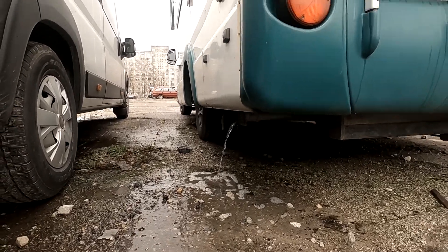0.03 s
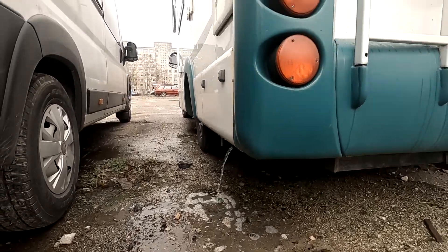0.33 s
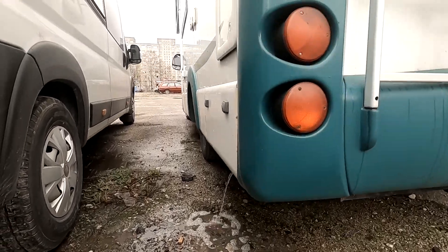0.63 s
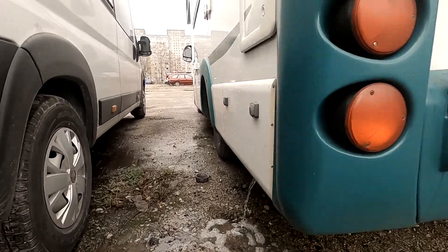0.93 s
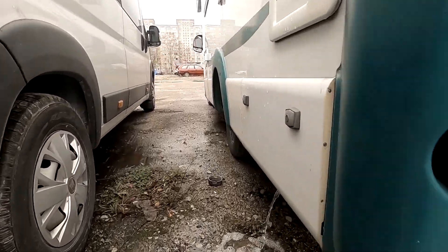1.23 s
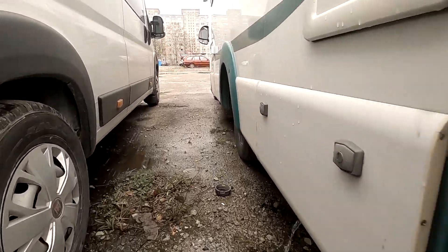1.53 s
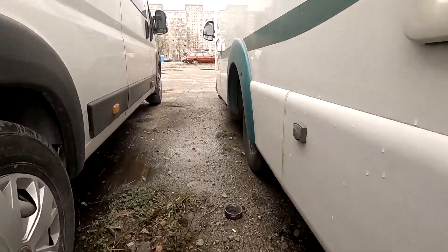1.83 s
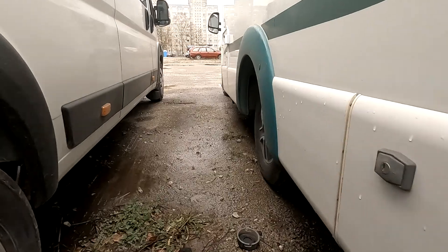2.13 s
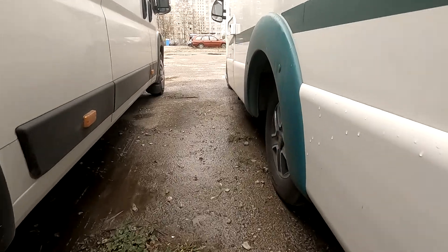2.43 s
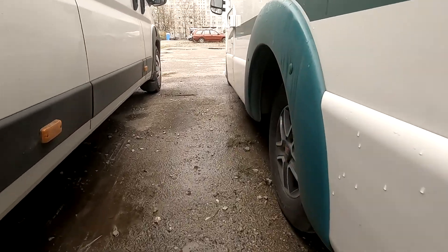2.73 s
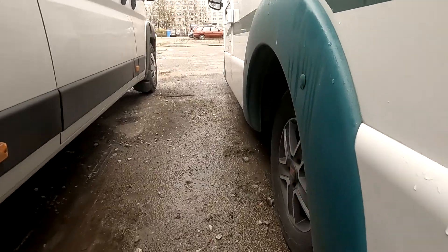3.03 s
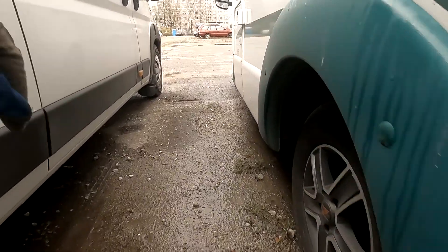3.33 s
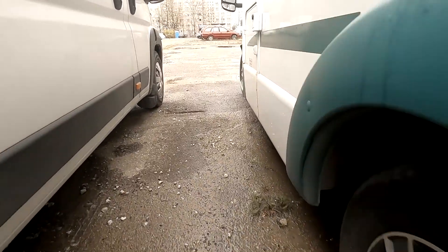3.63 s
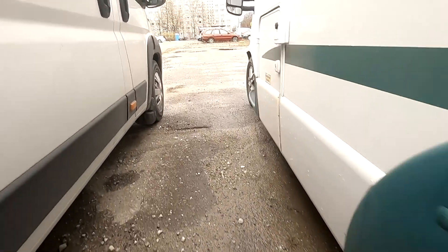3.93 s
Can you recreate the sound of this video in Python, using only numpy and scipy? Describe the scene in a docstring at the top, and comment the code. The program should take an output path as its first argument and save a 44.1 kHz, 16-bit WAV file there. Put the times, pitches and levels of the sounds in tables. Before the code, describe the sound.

Water trickles steadily into a puddle on gravel, with bright drips and small splashes. Wind rumbles on the handheld microphone, which bumps softly a few times. Later, grit rustles and a step scuffs, over a dull outdoor background.

```python
"""On wet gravel beside a motorhome, a thin stream of water spatters, pings and plops into a puddle.
Each drop slaps as it lands, and a trapped pocket of air rings. The microphone is carried past the
water into the gap between two vans, whose sides throw back short echoes. The hand holding it bumps,
gravel rustles and crunches underfoot, and gusts buffet it over a dull outdoor background."""
import sys
import numpy as np
from scipy import signal
from scipy.fft import rfft, irfft, next_fast_len
from scipy.io import wavfile
from scipy.ndimage import uniform_filter1d, map_coordinates

SR = 44100
rng = np.random.default_rng(int(sys.argv[2]) if len(sys.argv) > 2 else 0)


def store_pcm(level_fs):
    """Save levels as 16-bit WAV."""
    pcm = np.round(np.clip(level_fs, -1, 1) * 32767).astype(np.int16)
    wavfile.write(sys.argv[1], SR, np.atleast_2d(pcm).T)


N = 176400
TIME = np.arange(N) / SR


def amp(db):
    """Turn decibels into a gain."""
    return 10 ** (np.asarray(db) / 20)


def unit(x):
    """Scale x to an average strength (rms) of 1."""
    return x / np.sqrt(np.mean(x ** 2) + 1e-20)


def level(rows):
    """Join (t/s, level/dB) points into a gain for every sample."""
    return amp(np.interp(TIME, *np.transpose(rows)))


def wobble(per_s):
    """A smooth curve through per_s random values a second."""
    return map_coordinates(rng.standard_normal(2048), [TIME * per_s], mode="wrap")


def colour(x, points):
    """Shape the tone of x with (f/Hz, level/dB) points; the result has rms 1."""
    size = 2 * next_fast_len(N // 2 + 8192)
    hz, db = np.transpose(points)
    gain = amp(np.interp(np.log(np.fft.rfftfreq(size, 1 / SR) + 1), np.log(hz), db))
    # folding the cepstrum makes the filter ring after each hit, never before it
    cepstrum = irfft(np.log(gain))
    cepstrum[1:size // 2] *= 2
    cepstrum[size // 2 + 1:] = 0
    return unit(irfft(rfft(x, size) * np.exp(rfft(cepstrum)))[:N])


def noise(points):
    """Noise of rms 1, its tone shaped by the points."""
    return colour(rng.standard_normal(N), points)


def steady(x, span_s):
    """Even out the swells of x that are slower than span_s."""
    power = uniform_filter1d(x ** 2, max(int(span_s * SR), 2))
    return x / np.sqrt(np.abs(power) + 1e-9)


def add(out, start_s, x):
    """Mix x into out from start_s on."""
    i = int(np.clip(round(start_s * SR), 0, N - 1))
    out[i:i + len(x)] += x[:N - i]


def echoed(x, echo_db=-0.5, delay_s=0.0018, fade_s=0.1):
    """The ground and van sides throw back a short echo that falls 60 dB in fade_s."""
    t = TIME[:SR // 6]
    response = rng.standard_normal(len(t)) * amp(-60 * t / fade_s) * (t > delay_s)
    response *= amp(echo_db) / np.linalg.norm(response)
    response[0] = 1  # the direct sound
    return signal.fftconvolve(x, response)[:N]


def ticks(per_s, spread_db, clump_db, clump_hz):
    """Tiny impacts of random size that come in louder and softer clumps."""
    hits = rng.random(N) < per_s / SR
    size_db = spread_db * np.clip(rng.standard_normal(N), -2, 2)
    size_db += clump_db * np.clip(wobble(clump_hz), -2, 2)
    return hits * np.sign(rng.standard_normal(N)) * amp(size_db)


def patchy(x, depth_db=4.5):
    """The tone keeps shifting in brief random patches as the stream wanders over stones."""
    spectrum = signal.stft(x, nperseg=256)[2]
    patches = rng.standard_normal(spectrum.shape)
    for axis in (0, 1, 0, 1):  # smooth twice across pitch and time
        patches = uniform_filter1d(patches, size=5, axis=axis)
    gain = amp(depth_db * np.clip(unit(patches), -2, 2))
    return signal.istft(spectrum * unit(gain), nperseg=256)[1][:N]


def ping(hz, cycles, slap_gain, slap_fade_s=0.0054):
    """One drop slaps down and its air pocket rings, loudest after the given number of cycles."""
    t = TIME[:SR // 30]
    age = t * hz / cycles
    ring = (age * np.exp(1 - age)) ** 2 * np.sin(2 * np.pi * hz * t)
    hiss = signal.lfilter(*signal.butter(4, 8000, fs=SR), rng.standard_normal(len(t)))
    slap = hiss * amp(-60 * t / slap_fade_s)
    return echoed(ring + slap_gain * slap)


def pings(centre_hz, octaves, spread_db, cycles, slap_gain=0, per_s=170):
    """The stream breaks into many small drops, each with a random pitch and strength."""
    out = np.zeros(N)
    for when, pitch, size, life in rng.random((int(per_s * N / SR), 4)):
        hz = min(centre_hz * 2 ** (octaves * (2 * pitch - 1)), 10000)
        drop = ping(hz, cycles * (0.5 + life), slap_gain)
        add(out, when * N / SR, amp(spread_db * size ** 2) * drop)
    return steady(out, span_s=0.28)


# how loud the stream is over time: t/s, level/dB
STREAM_LEVEL = [(0.0, -39.5), (0.23, -41.5), (0.27, -36.5), (0.62, -37), (0.78, -37.5), (0.85, -40),
                (1.0, -38), (1.85, -39), (2.25, -37.5), (2.9, -38), (4.0, -42.5)]
# tone of water hitting gravel: f/Hz, level/dB
SPATTER_TONE = [(150, -28.5), (600, 11.5), (1600, 6), (2800, 0), (4000, 1.5), (5200, -8.5), (7000, -13.5),
                (8700, -14), (11000, -27.5), (15000, -47)]
# brighter tone of fine droplets: f/Hz, level/dB
SPRAY_TONE = [(700, -10), (2500, 3.5), (4800, 3.5), (7000, -7), (8800, -5.5), (11000, -20), (15000, -34)]


def stream():
    """Falling water spatters on gravel, with a smooth wash, small drops, tiny bubbles and spray."""
    hits = ticks(per_s=700, spread_db=5, clump_db=4, clump_hz=89.07)
    impacts = steady(echoed(hits, echo_db=0.5), span_s=0.14)
    spatter = amp(-4.5) * colour(impacts, SPATTER_TONE)
    wash = amp(-5) * noise(SPATTER_TONE)
    water = patchy(spatter + wash)
    droplets = amp(-5.5) * pings(centre_hz=2938, octaves=0.7, spread_db=10.5, cycles=1.72, slap_gain=0.16)
    bubbles = amp(-9.5) * pings(centre_hz=1902, octaves=1.1, spread_db=12.5, cycles=5.8)
    spray = amp(-15.5) * colour(impacts, SPRAY_TONE)
    return level(STREAM_LEVEL) * (water + droplets + bubbles + spray)


# strength of the gusts: t/s, level/dB
GUST_LEVEL = [(0.0, -23.5), (0.21, -34), (0.23, -17.5), (0.34, -28), (0.41, -17), (0.49, -42),
              (0.54, -18.5), (0.65, -35.5), (0.73, -26.5), (0.76, -46), (0.87, -37.5), (1.02, -40),
              (1.27, -36.5), (1.32, -17.5), (1.37, -25.5), (1.41, -18.5), (1.59, -38), (1.73, -30),
              (1.78, -55), (1.95, -35.5), (1.98, -19), (2.06, -40), (2.1, -26), (2.43, -41.5), (2.48, -14),
              (2.63, -21.5), (2.67, -15), (2.78, -43), (3.22, -33), (3.48, -18.5), (3.6, -31),
              (3.65, -18.5), (3.68, -37), (3.87, -28), (4.0, -32.5)]
# their deep tone: f/Hz, level/dB
GUST_TONE = [(20, -16.5), (60, -0.5), (150, -1.5), (240, -8), (330, -18), (500, -29.5), (1000, -42.5),
             (5000, -120)]
# slow swell of air pressure under them: t/s, level/dB
RUMBLE_LEVEL = [(0, -27), (0.3, -28.5), (0.6, -20), (1.15, -36), (1.5, -29.5), (2.3, -33.5), (2.6, -27),
                (2.9, -33.5), (3.55, -26.5), (4.0, -33.5)]
# its even deeper tone: f/Hz, level/dB
RUMBLE_TONE = [(10, -17), (40, 0.5), (80, -3.5), (130, -14), (250, -33.5), (2000, -120)]


def wind():
    """Gusts flutter at the microphone over a slower rumble."""
    gusts = level(GUST_LEVEL) * steady(noise(GUST_TONE), span_s=0.0468) * amp(2.5 * wobble(60))
    rumble = level(RUMBLE_LEVEL) * steady(noise(RUMBLE_TONE), span_s=0.096) * amp(1 + 1.2 * wobble(18))
    return gusts + rumble


# how loud the outdoor background is: t/s, level/dB
OUTDOOR_LEVEL = [(0, -34.5), (1.2, -40.5), (2.4, -37), (4, -35.5)]
# its dull tone: f/Hz, level/dB
OUTDOOR_TONE = [(30, 9.5), (200, -0.5), (320, -6.5), (420, 0.5), (520, -1.5), (700, -2.5), (2000, -18),
                (14000, -70)]


def background():
    """A dull outdoor noise sinks a little and comes back."""
    return level(OUTDOOR_LEVEL) * noise(OUTDOOR_TONE)


# single drops that stand out: t/s, relative level/dB, f/Hz
LOUD_DROPS = [(0.0354, -19.5, 3270), (0.254, -21, 3070), (0.3062, -22.5, 1350), (0.478, -23.5, 2920),
              (0.625, -19, 2970), (0.6634, -22, 2510), (0.695, -25.5, 1780), (0.7616, -20.5, 2080),
              (0.973, -21.5, 2820), (1.013, -23, 1830), (1.0955, -19.5, 2440), (1.143, -22, 2900),
              (1.249, -20, 3100), (1.3217, -15.5, 2780), (1.365, -25, 2600), (1.47, -14, 3760),
              (1.5697, -18, 2700), (2.109, -19, 2340), (2.1782, -14.5, 3240), (2.2347, -13, 2770),
              (2.3077, -16.5, 2300), (2.3473, -21, 1820), (2.398, -21, 1160), (2.562, -20, 1770),
              (2.599, -21.5, 3200), (2.645, -19, 2860), (2.7178, -20, 3600), (2.753, -16.5, 1900),
              (2.8574, -17.5, 2650), (2.9147, -16, 1650), (3.0946, -9, 2090), (3.1255, -18, 2900),
              (3.203, -21.5, 1290), (3.3206, -20, 3760), (3.444, -17.5, 2220), (3.5143, -18, 2480),
              (3.8603, -20.5, 2910), (3.9372, -20.5, 3450)]
# low plops in the puddle: t/s, relative level/dB, f/Hz
PUDDLE_PLOPS = [(0.283, -25, 533), (0.597, -24.5, 770), (0.618, -25, 690), (0.811, -28, 660),
                (0.972, -25.5, 680), (1.806, -24, 475), (2.279, -26, 554), (2.868, -20, 595),
                (2.995, -23.5, 514)]


def drops():
    """Fat drops ping on the wet ground or plop into the puddle."""
    out = np.zeros(N)
    for start_s, db, hz in LOUD_DROPS:
        add(out, start_s, amp(db - 3.5) * ping(hz, cycles=1.57, slap_gain=0.27))
    for start_s, db, hz in PUDDLE_PLOPS:
        add(out, start_s, amp(db + 1.5) * ping(hz, cycles=1.0, slap_gain=0.13))
    return out


# bright splashes off stones: t/s, relative level/dB
STONE_SPLASHES = [(0.083, -34), (0.2605, -31), (0.3034, -25), (0.345, -34), (0.398, -29), (0.481, -30),
                  (0.545, -25.5), (0.594, -29.5), (0.622, -26), (0.647, -32), (0.695, -40), (0.762, -28.5),
                  (0.782, -32.5), (0.878, -31), (1.0157, -25), (1.075, -30.5), (1.135, -28.5),
                  (1.165, -27.5), (1.21, -27.5), (1.272, -29), (1.381, -29.5), (1.487, -27),
                  (1.6435, -26.5), (1.785, -26), (2.107, -25.5), (2.165, -24), (2.255, -28), (2.371, -27),
                  (2.561, -31.5), (2.63, -26), (2.717, -32), (2.783, -27.5), (3.164, -31), (3.229, -30.5),
                  (3.26, -33.5), (3.39, -32.5), (3.5723, -29.5), (3.938, -32)]


def splashes(rise_s=0.0015, fade_s=0.1):
    """The stream hits a stone and bursts into a brief shower of ticking, plinking droplets."""
    bursts, t = np.zeros(N), TIME[:SR // 4]
    for start_s, db in STONE_SPLASHES:
        add(bursts, start_s, amp(db - 4 - 60 * t / fade_s) * (1 - np.exp(-t / rise_s)))
    hits = ticks(per_s=1300, spread_db=4, clump_db=4.5, clump_hz=199.6)
    shower = patchy(colour(echoed(hits, echo_db=-3.5), SPRAY_TONE))
    plinks = amp(-3) * pings(centre_hz=4174, octaves=0.816, spread_db=13.5, cycles=3.6)
    return bursts * steady(shower + plinks, span_s=0.02)


# dull bumps of the hand on the microphone: t/s, relative level/dB, f/Hz
HAND_BUMPS = [(0.235, -8.5, 110), (0.397, -6, 166), (0.537, -4, 90), (1.309, -3.5, 151.5),
              (2.491, -4, 163.3)]


def bumps(rise_s=0.011):
    """The grip shifts: a soft knock rocks the microphone's case for a few cycles."""
    out, t = np.zeros(N), TIME[:SR // 10]
    age = t / rise_s
    knock = amp(-19) * np.exp(-((age - 1) / 0.14) ** 2)
    for start_s, db, hz in HAND_BUMPS:
        rocking = age * np.exp(1 - age) * np.sin(2 * np.pi * hz * t)
        add(out, start_s, amp(db - 8) * (rocking + knock))
    return out


# notes at which the gap between the vans rings: f/Hz, relative level/dB
GAP_NOTES = [(425, -3.5), (522, -1.5)]
# the ringing grows as the microphone enters the gap: t/s, level/dB
GAP_LEVEL = [(0.8, -62), (2.2, -43.5), (4.0, -42.5)]


def gap(width_hz=27):
    """Outdoor noise makes the air between the two van sides ring faintly."""
    ring = np.zeros(N)
    for hz, db in GAP_NOTES:
        resonance = signal.iirpeak(hz, hz / width_hz, fs=SR)
        ring += amp(db) * unit(signal.lfilter(*resonance, noise(OUTDOOR_TONE)))
    return level(GAP_LEVEL) * steady(ring, span_s=0.2)


# how loud the shifting wet gravel is: t/s, level/dB
RUSTLE_LEVEL = [(1.0, -59), (1.8, -54), (2.03, -53), (2.18, -47.5), (2.45, -52.5), (2.72, -54), (2.94, -43),
                (3.1, -59), (4.0, -64)]
# its thin, high tone: f/Hz, level/dB
RUSTLE_TONE = [(2000, -7), (5500, 3), (10500, -4.5), (13000, -15.5), (15000, -23)]


def rustle():
    """Fine grit rubs together under the walker's weight, swelling and fading around each step."""
    grit = echoed(ticks(per_s=3800, spread_db=3, clump_db=3, clump_hz=60))
    return level(RUSTLE_LEVEL) * steady(colour(grit, RUSTLE_TONE), span_s=0.14)


# tone of grit crunching underfoot: f/Hz, level/dB
CRUNCH_TONE = [(300, -3), (1200, -1), (3600, 7.5), (5500, -11), (9000, -12.5), (15000, -51)]
# how loud the sole scuffs: t/s, level/dB
SCUFF_LEVEL = [(2.84, -70), (2.89, -35), (2.96, -46), (3.025, -35), (3.13, -40), (3.33, -72)]
# the scuff's duller tone: f/Hz, level/dB
SCUFF_TONE = [(400, -28), (900, 3.5), (1300, 9.5), (1900, 6), (2700, -11), (5000, -29), (15000, -80)]


def step(start_s=2.911, rise_s=0.0034, fade_s=0.17):
    """A sole presses wet grit with a burst of dense ticks, then scuffs on."""
    t = np.maximum(TIME - start_s, 0)
    hits = ticks(per_s=2500, spread_db=2.5, clump_db=8, clump_hz=151.7)
    grit = steady(echoed(hits), span_s=0.03)
    press = amp(-22.5 - 60 * t / fade_s) * (1 - np.exp(-t / rise_s))
    return press * colour(grit, CRUNCH_TONE) + level(SCUFF_LEVEL) * colour(grit, SCUFF_TONE)


def scene():
    """Water, gravel, hand bumps, wind and background meet at one microphone."""
    water = stream() + splashes() + drops()
    outdoors = background() + gap()
    return (water + rustle() + step() + bumps() + wind() + outdoors)[None]


def record(dry, ceiling=0.58, top_hz=15000):
    """The recorder rounds off the hardest gusts and keeps nothing above top_hz."""
    rounded = dry / (1 + np.abs(dry / ceiling) ** 6) ** (1 / 6)
    size = next_fast_len(N + 8192)
    in_band = np.fft.rfftfreq(size, 1 / SR) < top_hz
    return irfft(rfft(rounded, size) * in_band, size)[:, :N]


dry = scene()
out = record(dry)
store_pcm(out)
```